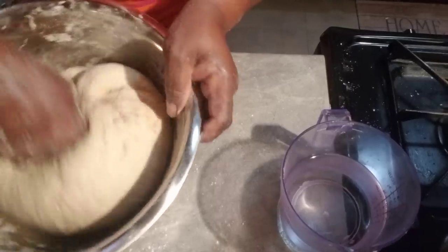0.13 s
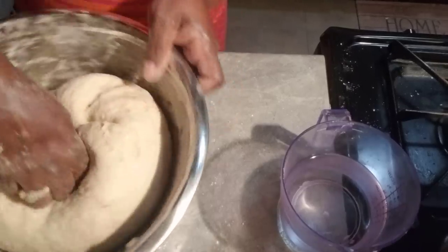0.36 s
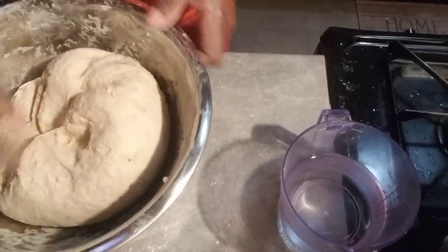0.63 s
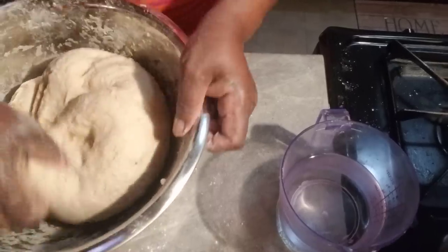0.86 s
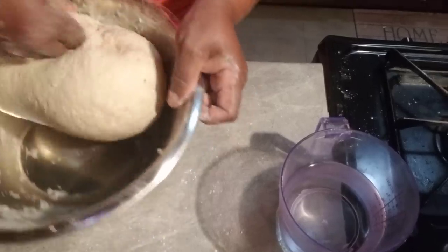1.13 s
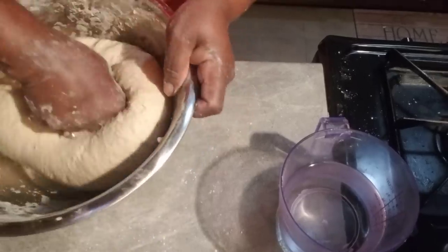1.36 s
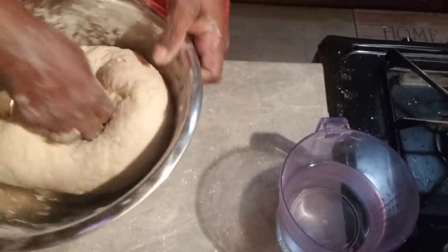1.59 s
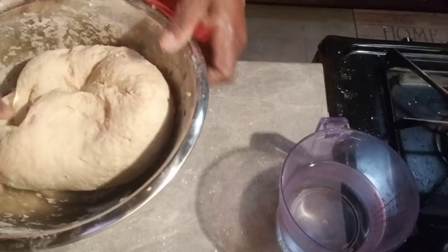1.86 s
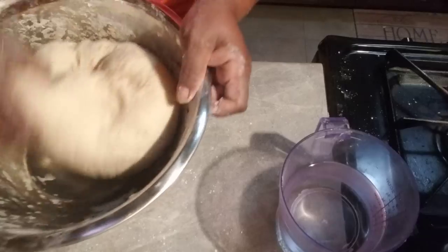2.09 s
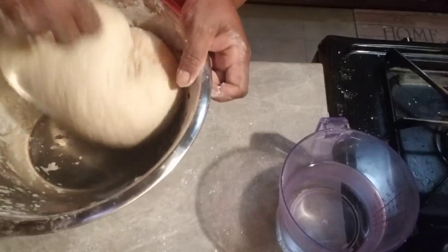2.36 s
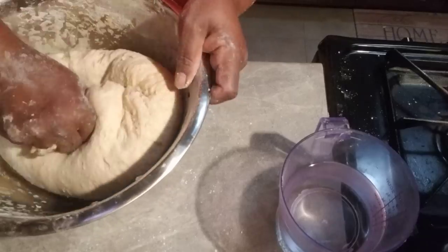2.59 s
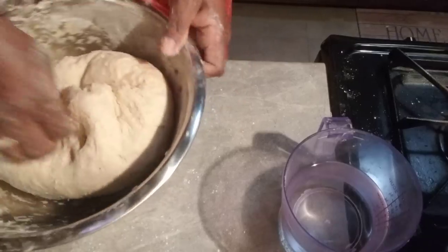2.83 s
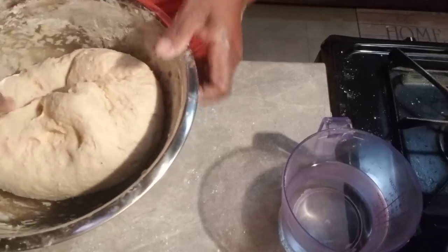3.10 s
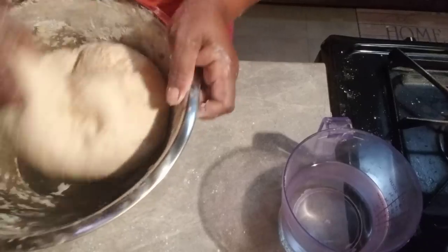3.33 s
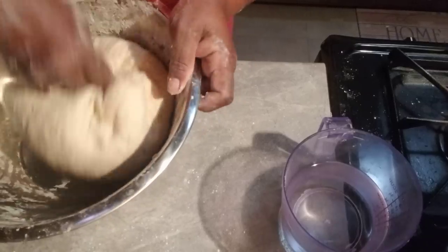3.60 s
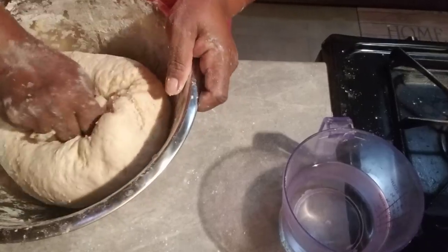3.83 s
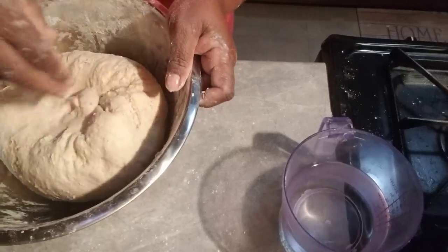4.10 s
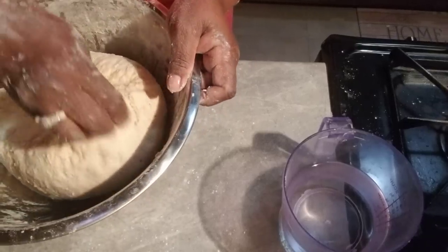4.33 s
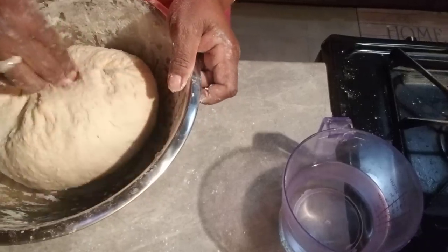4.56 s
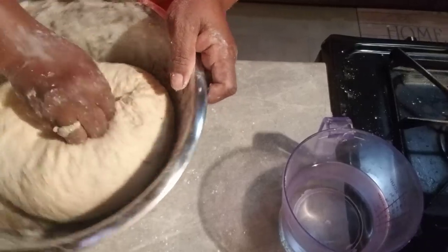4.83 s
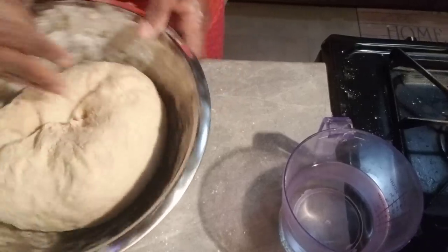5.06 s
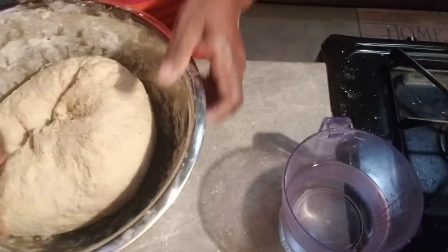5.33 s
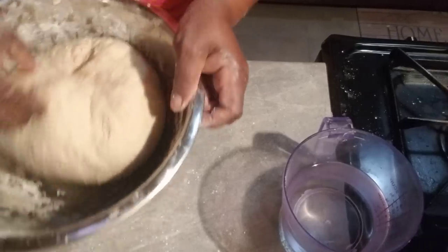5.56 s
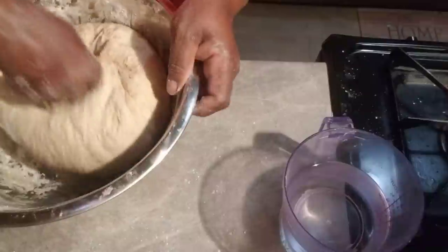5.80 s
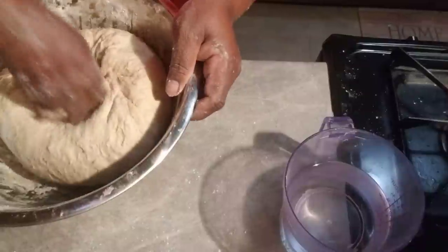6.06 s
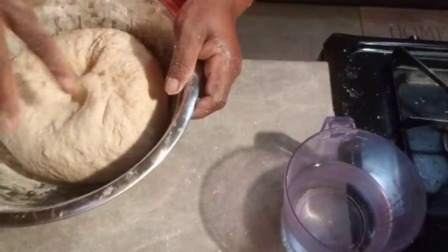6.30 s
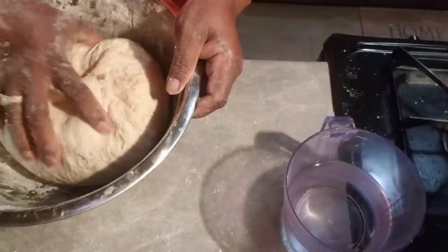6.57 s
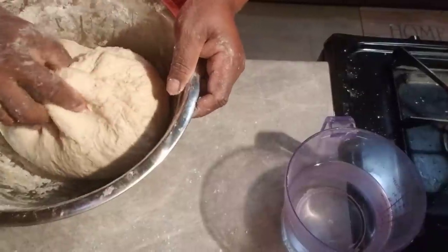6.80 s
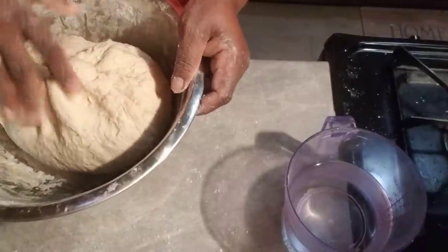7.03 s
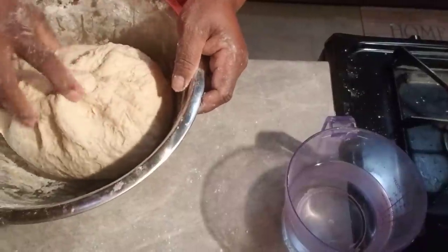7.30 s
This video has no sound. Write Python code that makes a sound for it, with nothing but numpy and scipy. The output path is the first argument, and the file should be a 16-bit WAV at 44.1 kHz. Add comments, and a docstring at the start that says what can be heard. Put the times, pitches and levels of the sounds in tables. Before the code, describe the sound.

Dough is kneaded in a steel bowl on a kitchen counter. Irregular hollow knocks, some sharp and tinny, some dull and cushioned, mix with faint dragging, finger slides and soft dough rubbing. The loudest early knock comes near one second; a bright steel clank rings out past five seconds, then duller bumps thin out. Close stereo microphones, small hard room, low hum.

```python
"""Dough is kneaded by hand in a steel bowl on a kitchen counter, close to a pair of microphones.
Knocks ring the modes of counter and bowl; random slips keep them sounding as the bowl drags.
Fingers and dough rub as shaped noise, with bright noise ticks, squeaks and a few bare clanks.
A short reverberation and a low hum with wavering tones make the small hard room."""
import sys
import numpy as np
from scipy import signal
from scipy.io import wavfile
from scipy.ndimage import uniform_filter1d

SR = 44100
rng = np.random.default_rng(int(sys.argv[2]) if len(sys.argv) > 2 else 0)


def rack_gain(trim_db):
    """Turn a fader trim in dB into the linear factor to multiply a signal by."""
    fader = np.asarray(trim_db, float)
    return 10 ** (fader / 20)


def digitize_waveform(pressure):
    """Quantize a signal to 16-bit integers and store it at the path in sys.argv[1].

    Rows of a 2-D input are taken as channels; values are limited to [-1, 1].
    """
    field = np.atleast_2d(pressure).T
    bounded = np.clip(field, -1, 1)
    quanta = np.round(bounded * 32767).astype(np.int16)
    wavfile.write(sys.argv[1], SR, quanta)


N = 327207

# All levels are relative: layer gains follow.
# Bowl meets counter. Each row: start in seconds, wall level in dB, wall's favoured pitch in Hz,
# counter level in dB, base level in dB, base's favoured pitch in Hz, rim level in dB.
KNOCKS = [(0.054, -39, 482, -39, -38.5, 270, -60), (0.174, -13.5, 543, -36.5, -26, 291, -25),
          (0.296, -35.5, 479, -33.5, -38, 214, -62), (0.765, -42.5, 710, -38, -38.5, 227, -52),
          (0.916, -7.5, 704, -32, -32, 380, -13), (1.337, -40.5, 487, -43, -51, 220, -52.5),
          (1.535, -33.5, 474, -37, -35, 195, -52), (1.884, -70.5, 456, -45.5, -63, 217, -79),
          (1.955, -33, 596, -42.5, -44, 270, -45), (2.076, -13.5, 555, -23.5, -28.5, 368, -24),
          (2.367, -63, 958, -58, -49, 220, -44.5), (2.399, -48, 740, -39, -49, 208, -67),
          (2.47, -16, 488, -37.5, -31, 290, -26), (2.539, -53, 700, -60, -43.5, 188, -69),
          (2.591, -52, 885, -71, -59, 248, -39.5), (2.785, -19.5, 474, -31.5, -19, 282.5, -44),
          (3.243, -48, 452, -41.5, -68, 232, -75), (3.326, -35.5, 524, -39.5, -41, 242, -43),
          (3.647, -50, 900, -55, -55, 220, -44), (3.6535, -26, 610, -37.5, -30.5, 190, -38),
          (3.671, -42, 500, -45, -36, 200, -55), (3.957, -13.5, 470, -24.5, -19.5, 207, -29.5),
          (4.736, -19, 446, -28, -23, 287, -33.5), (4.966, -15, 635, -31, -21, 278, -35),
          (5.285, -40, 590, -46, -36, 325, -50), (5.8, -19, 610, -24.5, -21.5, 220, -29),
          (6.066, -21, 477, -26.5, -25.5, 250, -45), (6.821, -24, 703, -32, -27, 254, -35)]
# Modes of counter, bowl base, wall, rim and upper rim. Each row: pitch in Hz, level in dB, t60 in seconds.
COUNTER_MODES = [(67, 1, 0.079), (118.9, 10.5, 0.08), (161.2, -10, 0.23)]
BASE_MODES = [(174.4, -1, 0.036), (227, 1, 0.11), (257.2, -3, 0.084), (328.2, -1, 0.084),
              (377, -8.5, 0.055)]
WALL_MODES = [(482, 1.5, 0.017), (605.4, 0.5, 0.044), (697, 11.5, 0.026), (781, -4, 0.082), (948, 6, 0.032),
              (970, -2.5, 0.042)]
RIM_MODES = [(1047, -1, 0.03), (1194, 3.5, 0.015), (1337, 1, 0.016), (1581, -24, 0.067)]
UPPER_RIM_MODES = [(1718, -2, 0.023), (1908, -2, 0.019), (2100, 0, 0.012), (2299, -4, 0.02),
                   (2450, 2.5, 0.0084), (2950, -7.5, 0.021), (3760, -3, 0.0096), (4304, -18, .012),
                   (5340, -18.5, .012)]
# Something hard strikes bare steel. Each row: start in seconds, level in dB, rattle length in seconds,
# share of the clear modes in dB.
CLANKS = [(3.176, -31, 0.0031, -20.5), (5.263, -32, 0.0089, -23.5), (5.2855, -7, .014, -11)]
# Clear modes of the bare steel: pitch in Hz.
STEEL_HZ = [331, 599, 1215, 1373, 1503, 1955, 2186, 2470, 2859, 3792, 3829, 3958, 4110, 4224, 4364, 4589,
            4676, 4718, 4911, 5298, 5843, 6331, 6772, 7351, 8096]
# The same modes. Each row: level in dB, t60 in seconds before the hand damps them.
STEEL_DECAYS = [(-16, 0.17), (-12.5, 0.17), (-13, 0.49), (0.5, 0.18), (-15.5, 0.44), (-14.5, 0.47),
                (-27, 0.27), (-18, 0.26), (-10, 0.16), (-11, 0.22), (-17.5, 0.54), (-10, .15), (-9, 0.17),
                (-13.5, .12), (-8, 0.21), (-18, .13), (-8, 0.19), (-10, 0.14), (-9.5, 0.17), (-20.5, .14),
                (-16, .18), (-10, 0.13), (-22.5, .17), (-25, .16), (-22, 0.2)]
# Spectra of steel's crowded modes, fingers, dough, hum and microphone hiss.
# Each row: frequency in Hz, relative level in dB per Hz.
STEEL_CROWD = [(290, -61.5), (500, -30), (586, -9), (761, -21.5), (988, -20), (1090, -21.5), (1380, -11.5),
               (1640, -19.5), (2460, -15), (3200, -26.5), (3860, -5.5), (7860, -15.5), (9360, -31),
               (14900, -30.5), (16000, -42.5)]
FINGER_SPECTRUM = [(1470, -45.5), (2500, -22.5), (2940, -17.5), (3180, -29), (4240, -7), (5610, -0.5),
                   (9810, -13), (12300, -18), (16000, -16)]
DOUGH_SPECTRUM = [(880, -25.5), (1500, -7), (1690, -20.5), (2020, -15), (2390, -15), (3730, -19),
                  (6060, -16), (9370, -24.5), (12000, -18), (15100, -22.5), (16000, -29.5)]
HUM_SPECTRUM = [(15, -41), (25, 6), (213, -10), (271, -19.5), (430, -19.5), (668, -17.5), (977, -23),
                (1220, -40), (1430, -31.5), (2310, -38), (3000, -46.5), (3900, -71.5), (6600, -120)]
HISS_SPECTRUM = [(1470, -29.5), (2500, -5), (3180, -13.5), (4340, -7), (4550, -11.5), (7020, -14.5),
                 (8020, -5), (9360, -22), (12400, -20), (16000, -21)]
# Wavering tones of the kitchen's machines: pitch in Hz.
WHINE_HZ = [53, 91, 130, 173, 208, 232, 384, 415, 830, 965, 1510, 2480]
# The same tones. Each row: width in Hz, level in dB.
WHINES = [(5.76, -55.5), (4.84, -57.5), (5.82, -60), (8, -62), (6.03, -57.5), (8.05, -60), (8, -65.5),
          (8.01, -69.5), (10.2, -75.5), (15.33, -77), (35, -75.5), (150, -81)]
# Left-right likeness of room and hum. Each row: frequency in Hz, correlation from -1 to 1.
LIKENESS = [(60, 0.95), (180, 0.93), (550, 0.38), (1650, -0.9), (4970, -0.68), (15000, -0.03)]
# Reverberation. Each row: frequency in Hz, t60 in seconds.
ROOM_T60 = [(100, 0.22), (500, 0.18), (2000, 0.19), (6000, 0.18), (14000, 0.06)]
# Bright ticks of the knocks, and small separate ticks.
# Each row: start in seconds, burst level in dB, upper rim level in dB.
TICKS = [(0.174, -35, -32.5), (0.7018, -50, -85), (0.7417, -44, -76), (0.7744, -37, -68),
         (0.9158, -20.5, -17), (1.028, -40.5, -44), (1.625, -36, -67), (1.6581, -40, -55),
         (1.6894, -45, -52), (1.9554, -47, -72), (2.0744, -46, -46), (2.285, -56, -60),
         (2.4708, -30.5, -39), (2.5592, -56, -48), (2.5924, -56, -51), (2.6236, -45, -53),
         (2.7852, -44, -46), (3.6935, -40, -59), (3.9586, -42, -51), (4.408, -45, -60),
         (4.7343, -21.5, -32), (4.964, -48.5, -51), (5.2854, -5.5, -25), (5.8, -26.5, -33),
         (6.065, -50, -50), (6.823, -55, -52.5), (6.9414, -37.5, -73), (7.0353, -38.5, -71)]
# Pitched scrapes and squeaks of the bowl.
# Each row: start in seconds, swell length in seconds, level in dB, pitch in Hz, width in Hz.
SCRAPES = [(0.997, 0.073, -46, 1394, 200), (1.061, 0.072, -41, 251, 60), (1.147, 0.05, -41, 292, 80),
           (2.71, 0.16, -58, 2450, 250), (2.125, 0.038, -37, 1444, 200), (3.318, 0.071, -49, 1420, 303),
           (3.09, .028, -60, 5400, 120), (4.79, .1, -46, 260, 120), (5.5, .09, -41, 255, 70),
           (5.59, .09, -44, 280, 90), (5.061, 0.025, -48, 656, 150), (5.853, 0.02, -40, 1253, 200)]
# Hands lean on the bowl. Each row: time in seconds, counter level in dB, bowl base level in dB.
WEIGHT = [(0.0, -49.5, -59), (0.35, -52, -52.5), (0.56, -53.5, -56), (0.78, -55.5, -61.5),
          (0.99, -46, -45.5), (1.22, -49, -54), (1.34, -58, -57.5), (1.88, -57, -58.5), (2.11, -36, -44),
          (2.23, -52.5, -50.5), (4.36, -52, -52.5), (4.65, -51, -52.5), (4.9, -46.5, -47), (5.1, -50, -56),
          (5.5, -49, -48.5), (6.47, -53, -55.5), (6.92, -50.5, -52.5), (7.42, -57, -52)]
# Strokes: bowl turned over the counter, fingers on steel, dough folded and pressed.
# Each row: peak time in seconds, rise in seconds, fall in seconds, level in dB.
# A stroke is 10 dB down one rise before its peak and one fall after it.
DRAG_STROKES = [(0.146, .006, .07, -47), (0.538, 0.21, 0.066, -52), (0.78, .01, 0.025, -50),
                (0.9, 0.094, .05, -48.5), (1.15, .15, 0.049, -53.5), (1.346, .05, 0.032, -55),
                (1.96, .04, .1, -53), (2.06, 0.067, .04, -43.5), (2.13, .012, .035, -36),
                (2.43, 0.17, .02, -51.5), (2.77, 0.14, 0.14, -53), (3.18, 0.044, 0.073, -50.5),
                (3.35, .1, 0.077, -42.5), (3.64, 0.045, .03, -52), (4.5, 0.088, 0.099, -53.5),
                (4.88, 0.14, .06, -50.5), (5.44, 0.099, .06, -47.5), (5.51, .02, .07, -42.5),
                (5.606, .04, 0.08, -46), (6.84, .015, .05, -48)]
SLIDE_STROKES = [(0.2, 0.041, 0.17, -60.5), (0.416, 0.23, .12, -57.5), (0.54, .04, 0.059, -60.5),
                 (0.71, 0.014, .04, -51), (0.748, 0.017, 0.038, -41.5), (0.83, .06, .05, -53),
                 (1.027, .04, 0.027, -51), (1.12, .1, 0.11, -65), (1.5, .06, .2, -65.5),
                 (1.64, .02, 0.086, -58.5), (1.831, 0.016, 0.022, -62.5), (1.955, 0.055, 0.19, -51.5),
                 (2.133, 0.028, .05, -53), (2.42, 0.17, 0.065, -60.5), (2.63, .01, 0.027, -63),
                 (2.78, .25, .025, -64), (3.102, 0.011, 0.046, -53.5), (3.23, .06, .1, -58),
                 (3.328, .04, 0.074, -56), (3.82, .2, 0.21, -68), (4.41, .006, 0.035, -61),
                 (4.92, 0.14, .2, -58.5), (5.44, .05, 0.044, -53.5), (5.672, 0.24, 0.043, -59),
                 (5.776, 0.016, .012, -54.5), (6.14, 0.13, 0.082, -73), (6.696, 0.098, 0.22, -66.5),
                 (6.954, .02, .12, -66)]
FOLD_STROKES = [(0.22, 0.047, 0.2, -61), (0.52, 0.17, 0.077, -59.5), (0.752, .03, .08, -74),
                (0.97, 0.16, 0.19, -56.5), (1.3, 0.042, .15, -67), (1.63, 0.16, 0.09, -62.5),
                (2.009, .05, .04, -63.5), (2.141, 0.058, 0.027, -52), (2.4, 0.28, 0.12, -69),
                (2.74, 0.095, .17, -57.5), (3.098, .02, .08, -67), (3.33, 0.078, 0.093, -54.5),
                (3.704, .3, 0.1, -68.5), (3.9, 0.11, 0.11, -70), (4.466, 0.088, 0.088, -65.5),
                (4.815, .07, 0.062, -64.5), (5.0, 0.11, 0.19, -58.5), (5.43, 0.095, 0.072, -60),
                (5.57, 0.17, 0.16, -63), (6.11, .06, 0.075, -62), (6.642, 0.079, 0.26, -74.5),
                (6.95, .07, .2, -71.5)]
# Rubbing between strokes and after knocks. Each holds: resting level in dB, shaken level in dB
# against the knock's wall, seconds to fall 10 dB (0 = no settling), unsteadiness in dB.
DRAG_RULE = (-65, -29.5, 0.04, 3.5)
SLIDE_RULE = (-78.5, -40, 0.0266, 2.5)
FOLD_RULE = (-79.5, -42, 0.0432, 1.5)
BASE_RULE = (-75.5, -34, 0, 1.5)

HUM_DB, HISS_DB = -53, -72
LAG_S, LEFT_DB = 0.0001, -1  # left microphone a little farther off
STROKE_SHAPE = 1.26  # 1 = pointed, 2 = rounded
BASE_SHARE_DB = -1.5  # how much of a drag reaches the bowl base
TICK_T60_S = 0.02


def evened(x):
    """Scales to an rms of 1."""
    return x / np.sqrt(np.mean(x ** 2) + 1e-20)


def read(points, hz):
    """Interpolates a curve over log frequency."""
    f, value = np.transpose(points)
    return np.interp(np.log(hz + 1), np.log(f + 1), value)


def add(mix, start_s, sound):
    """Adds a sound in place, cut at the end of the mix."""
    part = mix[..., round(start_s * SR):][..., :sound.shape[-1]]
    part += sound[..., :part.shape[-1]]


def ring(modes, rise_s, favoured_hz=None, fall_db=30, thud_db=-60, thud_t60=0.04):
    """Dying sines, peak 1; the place struck favours modes near one pitch, where dough adds a dead thud."""
    t = np.arange(SR // 4) / SR
    hz, db, t60 = np.transpose(modes)[:, :, None]
    thud = 0
    if favoured_hz:
        thud = rack_gain(thud_db - 60 * t / thud_t60) * np.sin(2 * np.pi * favoured_hz * t)
        db = db - fall_db * abs(np.log2(hz / favoured_hz))  # dB an octave
    tones = (rack_gain(db - 60 * t / t60) * np.sin(2 * np.pi * hz * t)).sum(0)
    x = (thud + tones) * (1 - np.exp(-t / rise_s)) ** 2
    return x / abs(x).max()


def stereo(left, other, same):
    """Mixes two independent signals into a pair of given correlation."""
    return np.array([left, same * left + np.sqrt(1 - same ** 2) * other])


def noise(spectrum, likeness, patchy_db, size):
    """Two channels of random short-time spectra with drifting patches, rms 1."""
    frames, hz = 4 * N // size + 5, np.fft.rfftfreq(size, 1 / SR)
    a, b, c, d, patches = rng.standard_normal((frames, len(hz), 5)).T
    patches = uniform_filter1d(patches, size=9, axis=0)
    patches = evened(uniform_filter1d(patches, size=9, axis=1))
    same = np.clip(read(likeness, hz), -1, 1)[:, None]
    z = stereo(a + 1j * b, c + 1j * d, same)
    z *= rack_gain(read(spectrum, hz)[:, None] + patchy_db * patches)
    return evened(signal.istft(z, nperseg=size, noverlap=size * 3 // 4)[1][:, :N])


def fuzzy(hz, width_hz, size):
    """Two channels of noise in one narrow resonance, rms 1."""
    r = np.exp(-np.pi * width_hz / SR)
    a, b, c, d = rng.standard_normal((size, 4)).T
    slow = signal.lfilter([1], np.convolve([1, -r], [1, -r]), [a + 1j * b, c + 1j * d])
    return evened((slow * np.exp(2j * np.pi * hz * np.arange(size) / SR)).real)


def grit(per_s, spread_db):
    """Sparse slips of random sign; a few are large."""
    chance, size, sign = rng.random((N, 3)).T
    return (chance < per_s / SR) * rack_gain(-spread_db * np.log(size + 0.011)) * np.sign(sign - 0.5)


def slipping(per_s, spread_db, body):
    """Random slips drive a ringing body steadily, rms 1."""
    return evened(signal.oaconvolve(grit(per_s, spread_db), body)[:N])


def level_curve(rows, column=1):
    """One column of a level table as a gain."""
    rows = np.transpose(rows)
    return rack_gain(np.interp(np.arange(N) / SR, rows[0], rows[column]))


def strokes(rows, rest_db, shaken_db, settle_s, unsteady_db):
    """Rubbing gain: strokes, settling after each knock and a resting level, all a little unsteady."""
    t = np.arange(0, N + 64, 64) / SR
    power = rack_gain(2 * rest_db) + 0 * t
    for s, rise_s, fall_s, db in rows:
        away = np.where(t < s, (s - t) / max(rise_s, 0.002), (t - s) / max(fall_s, 0.002))
        power = power + rack_gain(2 * (db - 10 * away ** STROKE_SHAPE))
    for s, wall_db, *_ in KNOCKS:
        power = power + (t > s) * rack_gain(2 * (wall_db + shaken_db - 10 * abs(t - s) / settle_s))
    waver = uniform_filter1d(rng.standard_normal(len(t)), size=12)
    waver = evened(uniform_filter1d(waver, size=12))
    return np.interp(np.arange(N) / SR, t, np.sqrt(power) * rack_gain(unsteady_db * waver))


def drag():
    """Slips of the bowl and the weight on it keep counter, base, wall and rims ringing faintly."""
    high = ring(WALL_MODES, 0.00022) + rack_gain(-4.5) * ring(RIM_MODES, 0.00041)
    high = high + rack_gain(-8) * ring(UPPER_RIM_MODES, 0.00039)
    counter = slipping(300, 3.14, ring(COUNTER_MODES, 0.003)) * level_curve(WEIGHT)
    dragged = rack_gain(BASE_SHARE_DB) * strokes(DRAG_STROKES, *BASE_RULE)
    pressed = np.hypot(level_curve(WEIGHT, column=2), dragged)
    base = slipping(300, 5.7, ring(BASE_MODES, 0.0027)) * pressed
    bowl = slipping(900, 2.6, high) * strokes(DRAG_STROKES, *DRAG_RULE)
    return rack_gain(-1.5) * (counter + base) + rack_gain(-4.0) * bowl


def hands():
    """Fingers slide on steel with a narrow hiss; dough and skin rub with a wide, slightly gritty one."""
    likeness = [(1000, 0.35), (16000, 0.0397)]
    fingers = noise(FINGER_SPECTRUM, likeness, 2.5, size=256) * strokes(SLIDE_STROKES, *SLIDE_RULE)
    grain = 1 + 12 * abs(uniform_filter1d(grit(190, 4.3), size=40))
    dough = noise(DOUGH_SPECTRUM, likeness, 2.17, size=256) * grain * strokes(FOLD_STROKES, *FOLD_RULE)
    return rack_gain(1.5) * fingers + rack_gain(6.5) * dough


def hum():
    """Steady low noise and narrow wavering tones of the kitchen, alike at both microphones in the bass."""
    out = rack_gain(HUM_DB) * noise(HUM_SPECTRUM, LIKENESS, 0.5, size=2048)
    for hz, (width_hz, db) in zip(WHINE_HZ, WHINES):
        left, other = fuzzy(hz, width_hz, size=N)
        out += rack_gain(db) * stereo(left, other, np.clip(read(LIKENESS, hz), -1, 1))
    return out


def knocks():
    """Each blow is shared by counter, base, wall and rim; cushioned blows reach wall and rim more slowly."""
    out = np.zeros(N)
    for s, wall_db, wall_hz, counter_db, base_db, base_hz, rim_db in KNOCKS:
        cushion = rack_gain(0.235 * (base_db - rim_db))  # dull blow = slow contact
        base = ring(BASE_MODES, 0.0013, base_hz, 11, thud_db=12, thud_t60=0.046)
        wall = ring(WALL_MODES, 0.0009 * cushion, wall_hz, 17.0, thud_db=15.5, thud_t60=0.014)
        add(out, s, rack_gain(counter_db + 8.5) * ring(COUNTER_MODES, 0.0043))
        add(out, s, rack_gain(base_db + 11) * base)
        add(out, s, rack_gain(wall_db) * wall)
        add(out, s, rack_gain(rim_db + 7) * ring(RIM_MODES, 0.00055 * cushion))
    return out


def ticks():
    """Bursts of bright noise die at once, with a short ring of the upper rim."""
    out, t = np.zeros((2, N)), np.arange(SR // 10) / SR
    for s, burst_db, rim_db in TICKS:
        burst = np.diff(rng.standard_normal((len(t) + 1, 2)).T) * rack_gain(-60 * t / TICK_T60_S)
        burst = 0.17 * burst[0] + 1.08 * burst  # partly alike at both microphones
        add(out, s, rack_gain(burst_db - 13.5) * signal.lfilter([1], [1, -0.65], burst))
        add(out, s, rack_gain(rim_db + 7.5) * ring(UPPER_RIM_MODES, 0.000085))
    return out


def scrapes():
    """Narrow-band squeaks swell and fade as half a sine, cut at 0.1 s."""
    out, t = np.zeros((2, N)), np.arange(SR // 10) / SR
    for s, length_s, db, hz, width_hz in SCRAPES:
        swell = np.sin(np.pi * np.minimum(t / length_s, 1))
        add(out, s, rack_gain(db) * swell * fuzzy(hz, width_hz, size=len(t))[0])
    return out


def clanks():
    """Struck bare steel rings in clear modes; noise for its crowded modes holds for the rattle, then dies."""
    out, t = np.zeros((2, N)), np.arange(SR // 2) / SR
    hz, (db, t60) = np.array(STEEL_HZ)[:, None], np.transpose(STEEL_DECAYS)[:, :, None]
    shimmer = noise(STEEL_CROWD, [(300, 0.8), (16000, 0.2)], 1.5, size=512)
    for s, level_db, rattle_s, clear_db in CLANKS:
        start, apart = rng.random((len(STEEL_DECAYS), 2, 1)).transpose(1, 0, 2)
        turns = hz * t + np.array([start, start + 0.3 * (apart - 0.5)])  # phases differ a little by side
        held_db = -60 * (t / 0.32) ** 2  # the hand on the rim damps the ring more and more
        clear = rack_gain(held_db) * (rack_gain(db - 60 * t / t60) * np.sin(2 * np.pi * turns)).sum(1)
        crowd = shimmer[:, round(s * SR):][:, :len(t)] * rack_gain(-60 * np.maximum(t - rattle_s, 0) / 0.11)
        both = rack_gain(clear_db) * clear + rack_gain(-10.5) * crowd
        add(out, s, rack_gain(level_db) * both * (1 - np.exp(-t / 0.00049)))
    return out


def room(x):
    """Sparse taps of random sign, each band dying at its own speed; the bass stays alike on both sides."""
    taps = np.zeros((2, SR // 2))
    at = np.arange(150, SR // 2 - 20, 20) + rng.integers(0, 20, (2, (SR // 2 - 151) // 20))
    np.put_along_axis(taps, at, rng.choice([-1., 1.], at.shape), 1)
    hz, t, z = signal.stft(taps, SR, nperseg=512)
    z = stereo(z[0], z[1], np.clip(read(LIKENESS, hz), 0, 1)[:, None])
    tail = signal.istft(z * rack_gain(-60 * t / read(ROOM_T60, hz)[:, None]), SR, nperseg=512)[1]
    return signal.fftconvolve(x, tail / np.linalg.norm(tail[0]), axes=1)[:, :N]


def scene():
    """Bowl sounds with their room, hands and hum; the left side lags and is softer."""
    near = drag() + knocks() + ticks() + scrapes() + clanks()
    # the counter's bass reaches the walls weakly
    thin = signal.lfilter(*signal.butter(1, 300, "high", fs=SR), near)
    left, right = near + rack_gain(-7.5) * room(thin) + hands() + hum()
    return np.array([np.roll(left, round(LAG_S * SR)) * rack_gain(LEFT_DB / 2), right * rack_gain(-LEFT_DB / 2)])


def top_cut(x):
    """Nothing passes above the cut-off."""
    return signal.sosfilt(signal.butter(12, 16620, fs=SR, output="sos"), x)


def record(dry):
    """The microphones hiss faintly and lose both ends of the range."""
    heard = dry + rack_gain(HISS_DB) * noise(HISS_SPECTRUM, [(2500, 0), (16000, 0)], 0.8, size=512)
    mix = signal.sosfilt(signal.butter(4, 44, "high", fs=SR, output="sos"), heard)
    mix = signal.oaconvolve(mix, signal.firwin(255, 16000, fs=SR)[None], "same")
    return top_cut(mix)


dry = scene()
out = record(dry)
digitize_waveform(out)
```